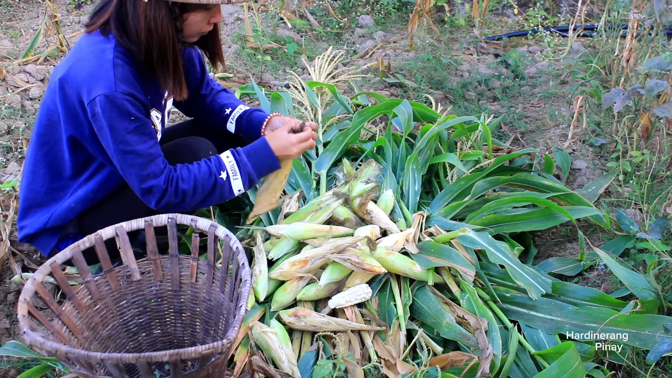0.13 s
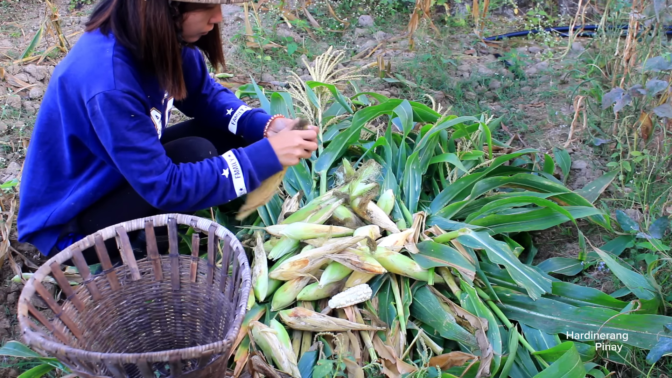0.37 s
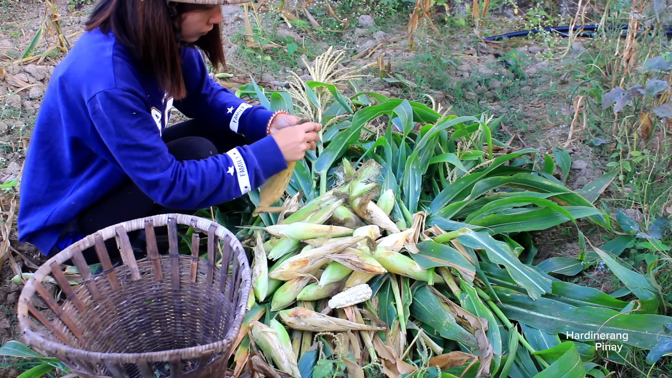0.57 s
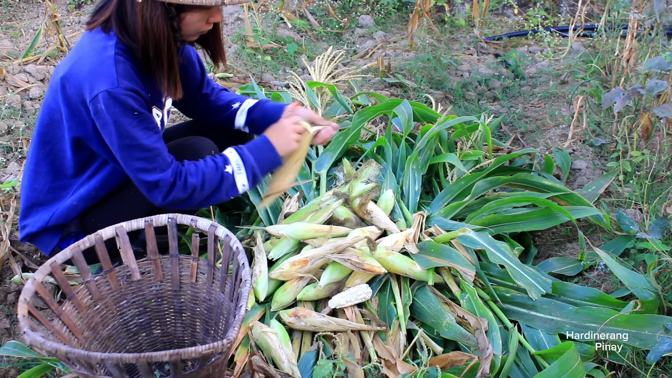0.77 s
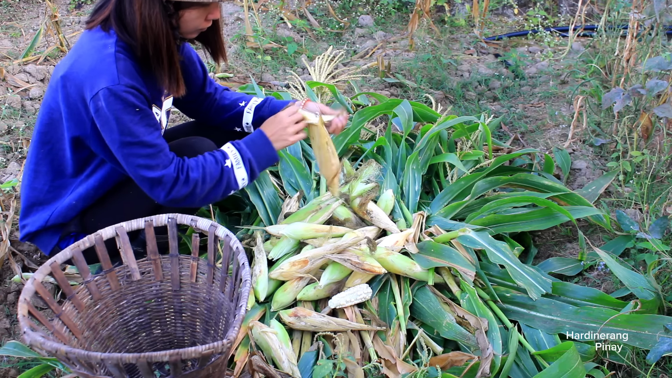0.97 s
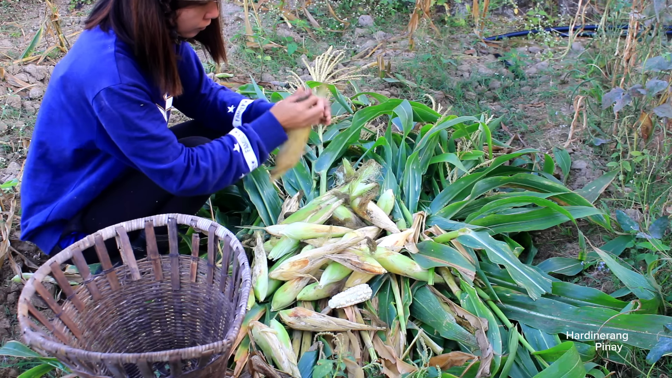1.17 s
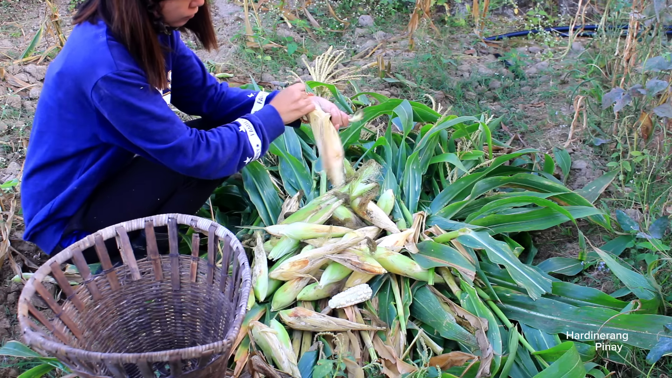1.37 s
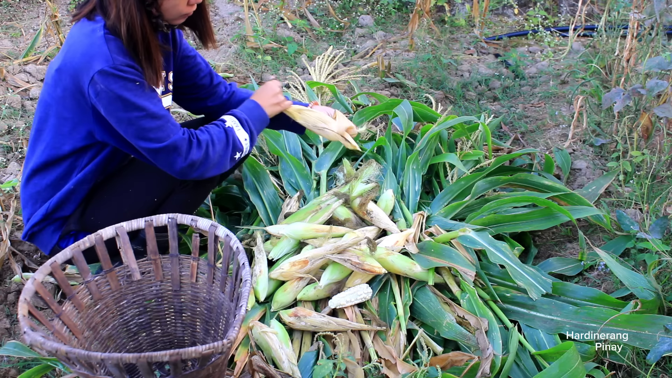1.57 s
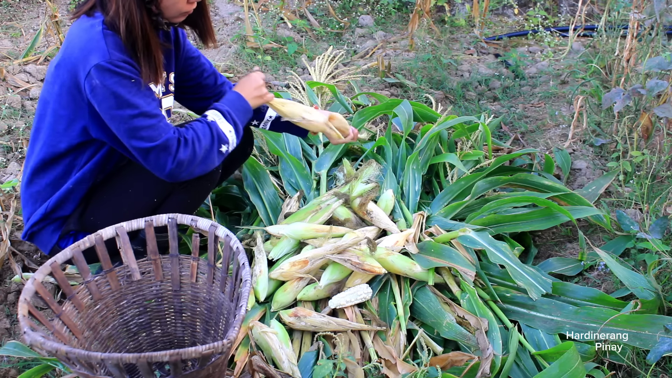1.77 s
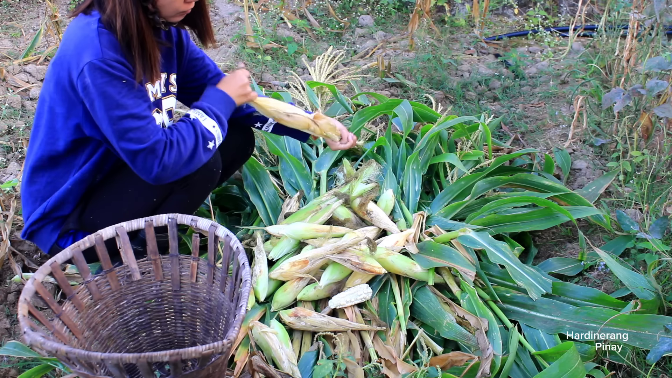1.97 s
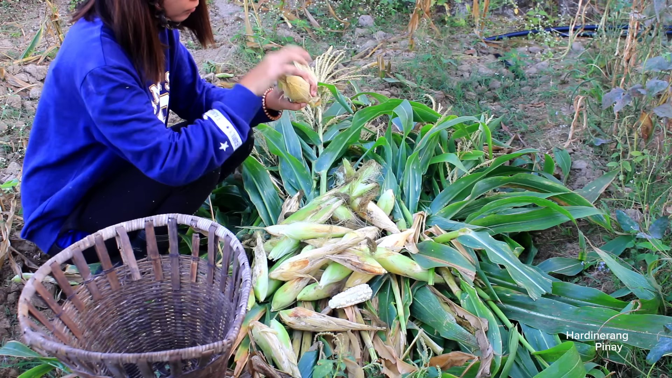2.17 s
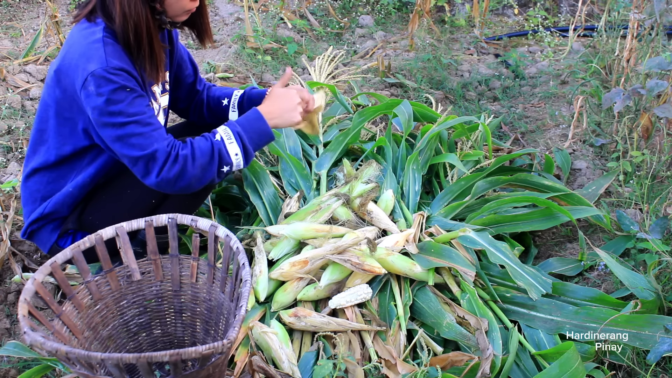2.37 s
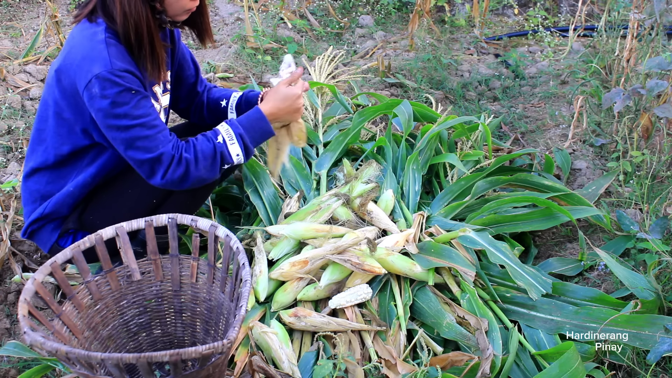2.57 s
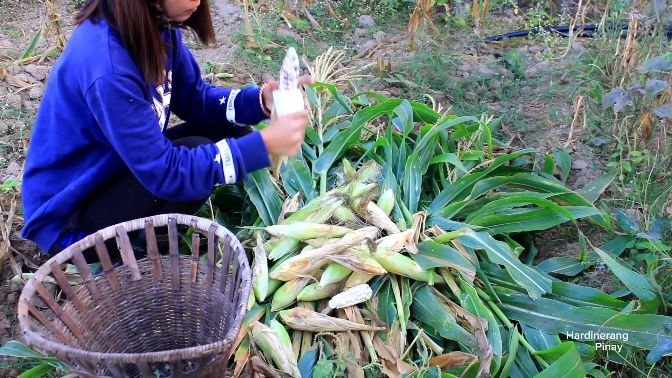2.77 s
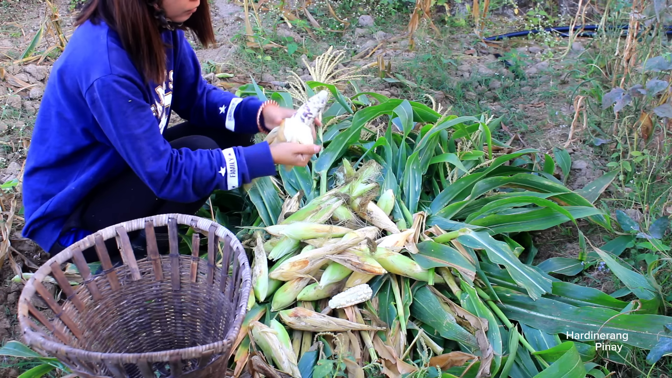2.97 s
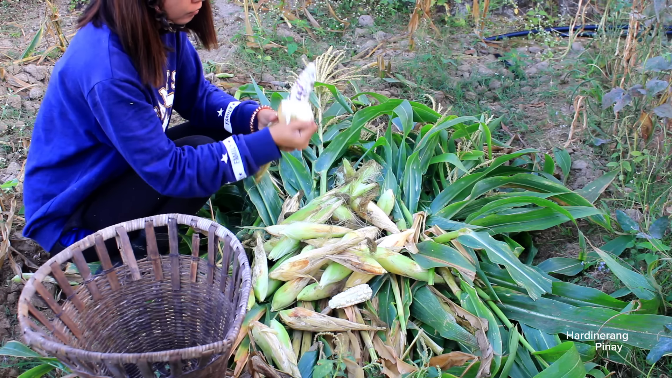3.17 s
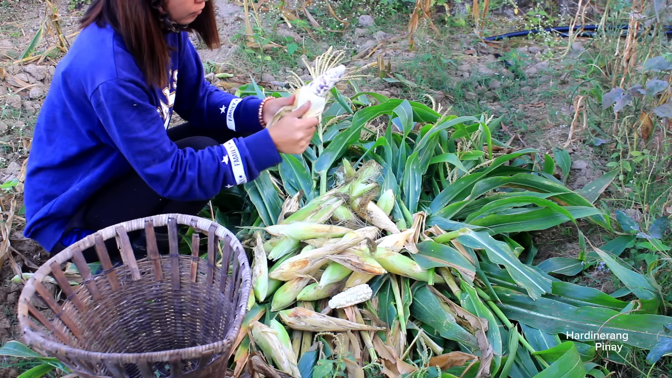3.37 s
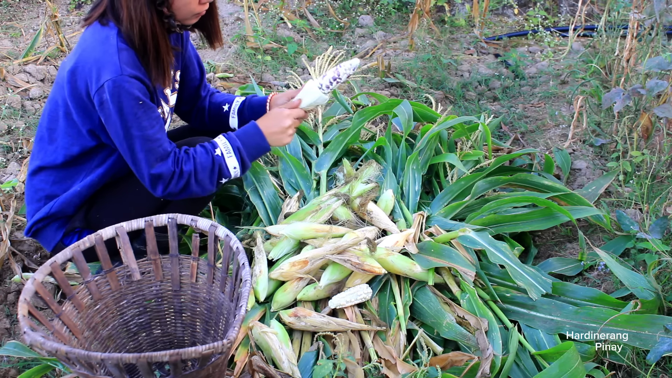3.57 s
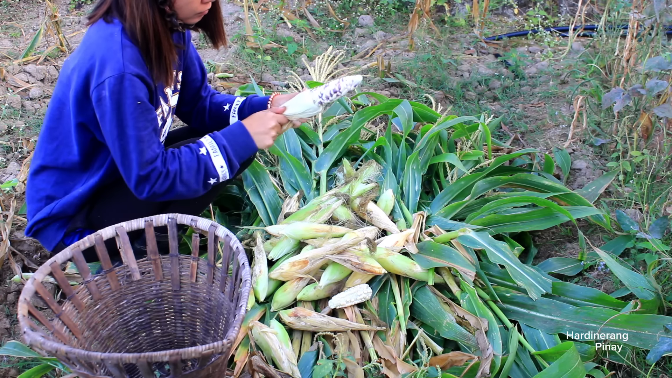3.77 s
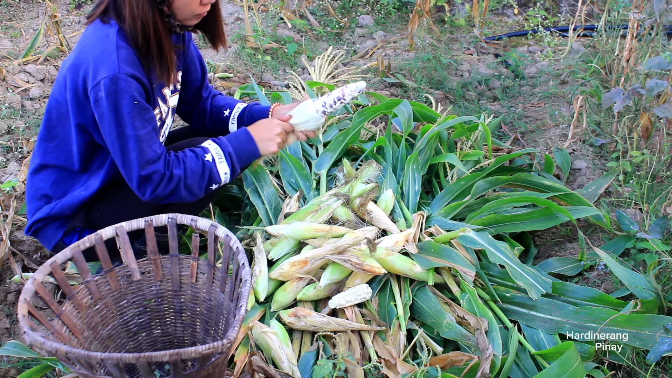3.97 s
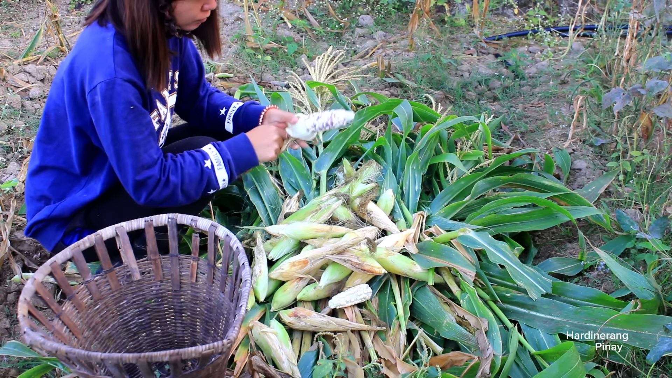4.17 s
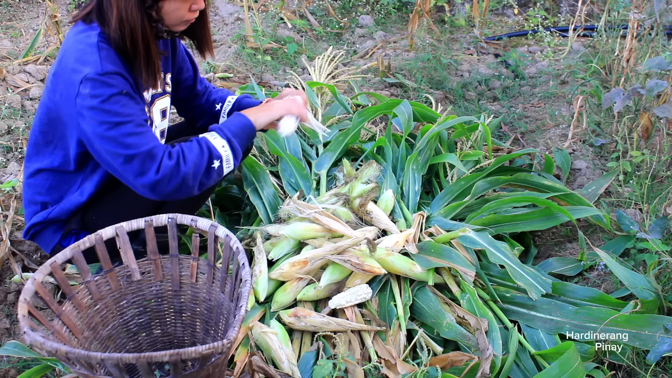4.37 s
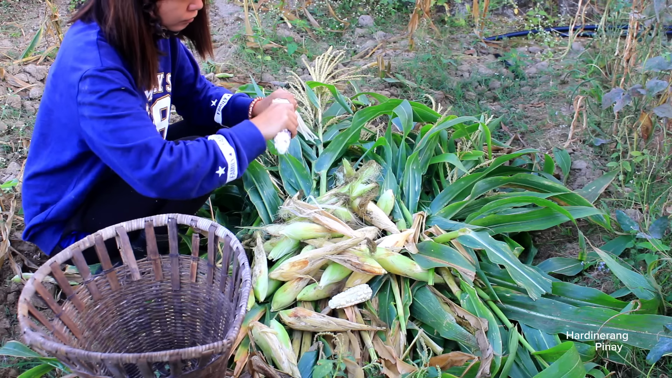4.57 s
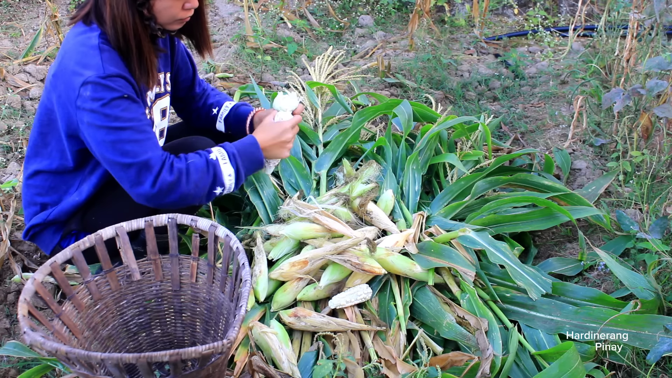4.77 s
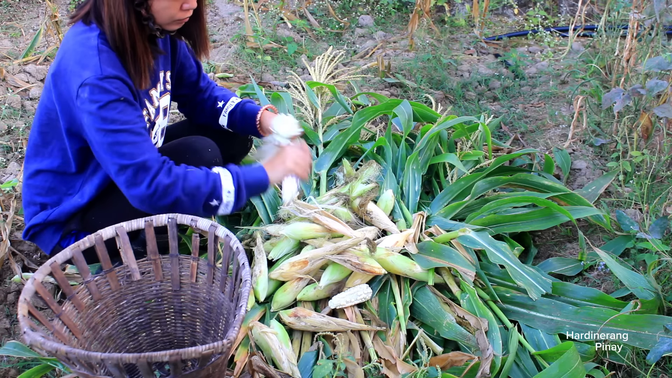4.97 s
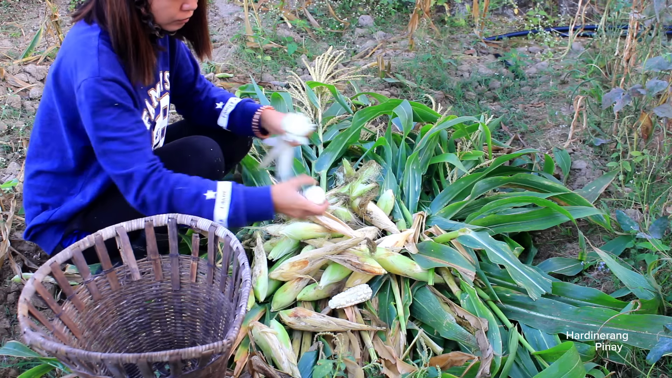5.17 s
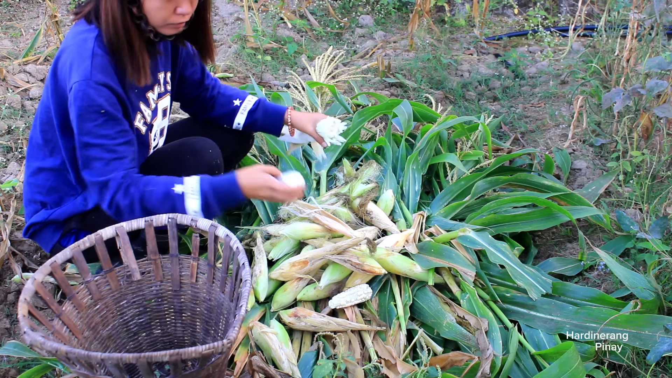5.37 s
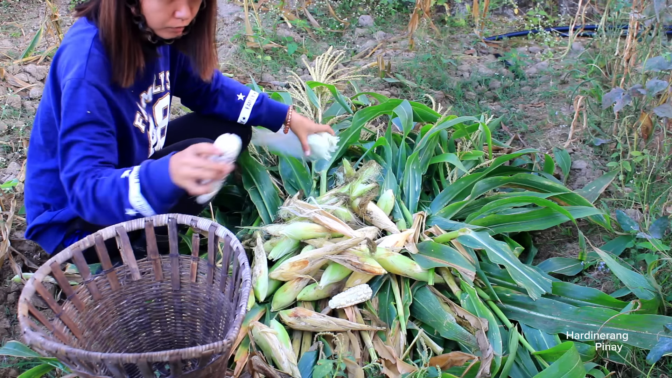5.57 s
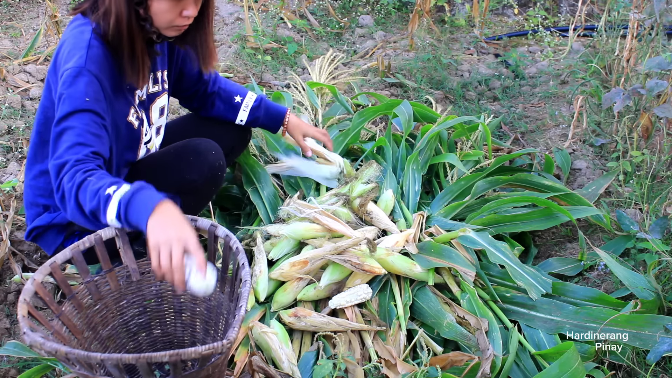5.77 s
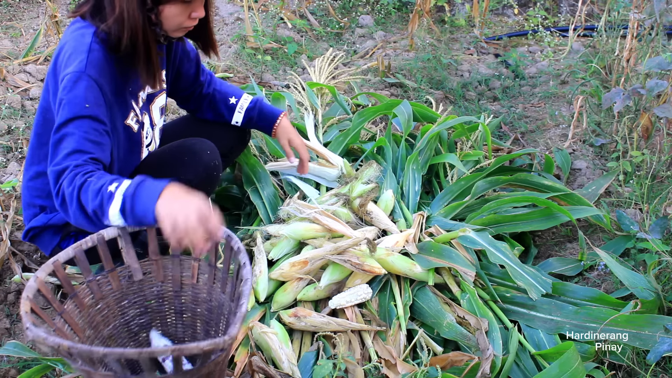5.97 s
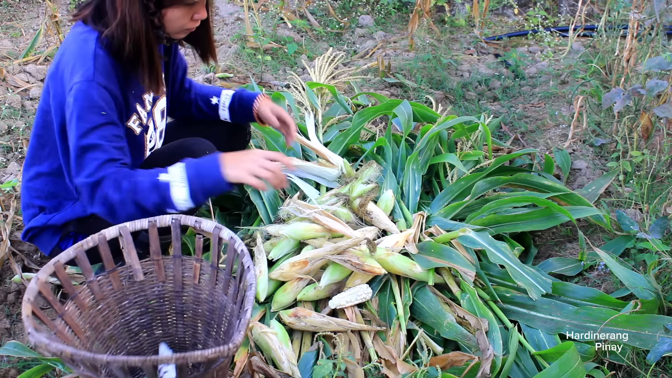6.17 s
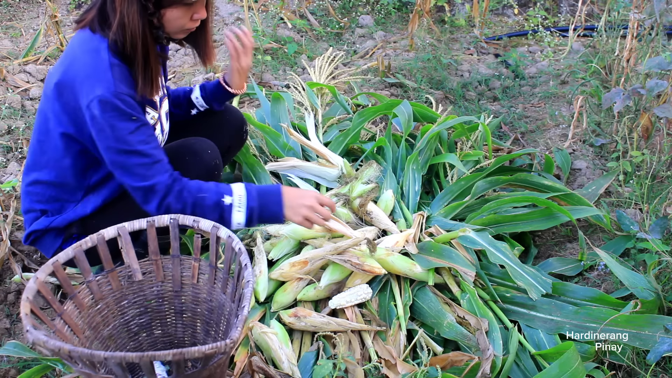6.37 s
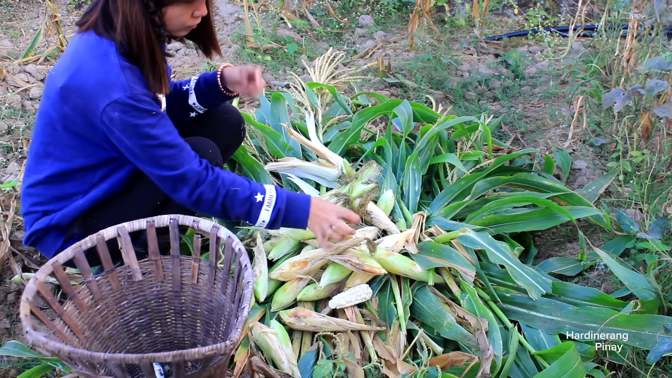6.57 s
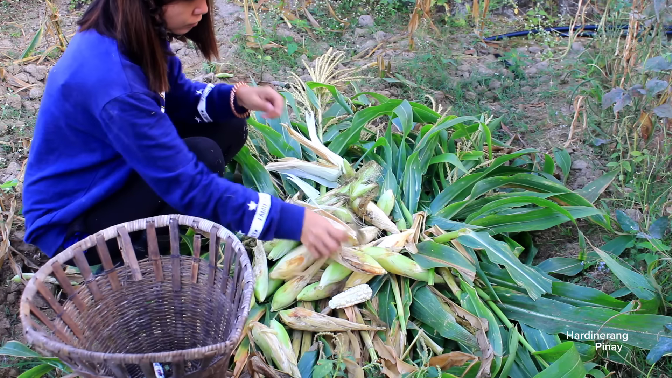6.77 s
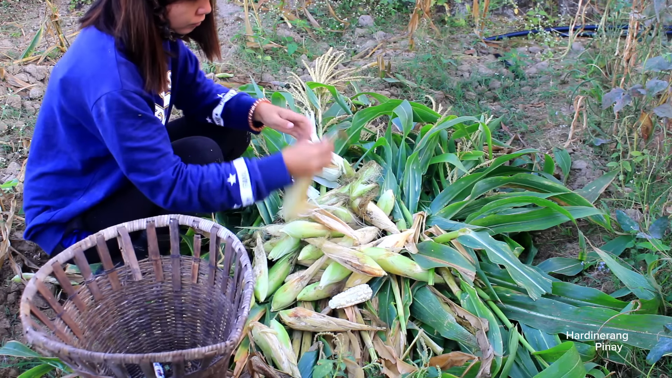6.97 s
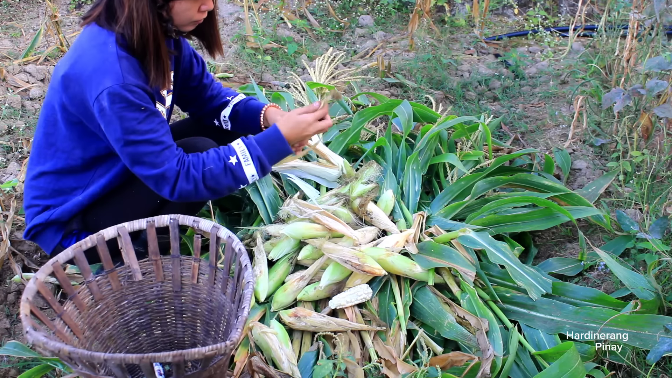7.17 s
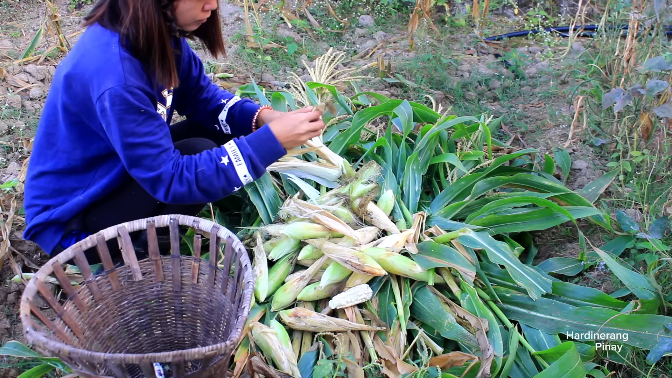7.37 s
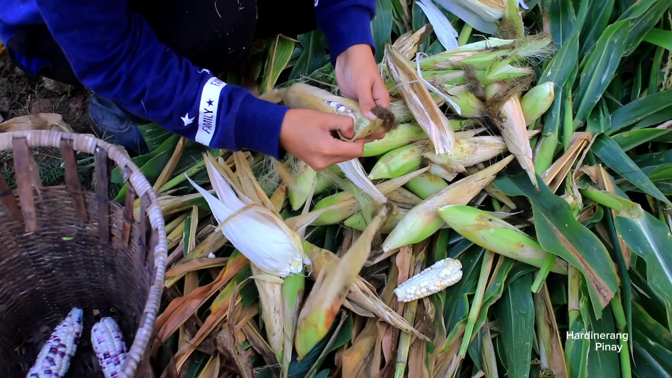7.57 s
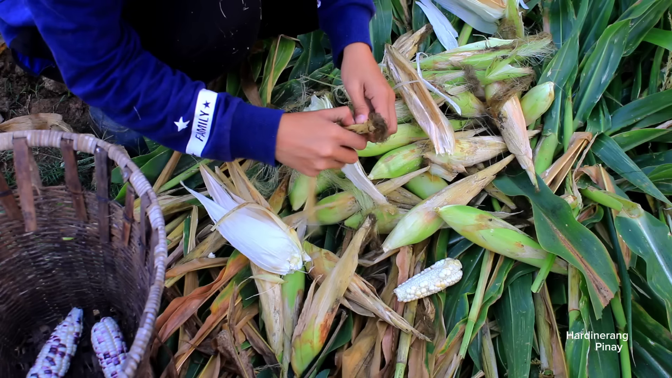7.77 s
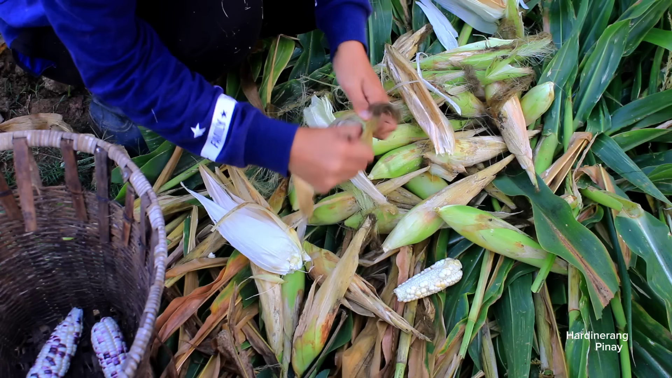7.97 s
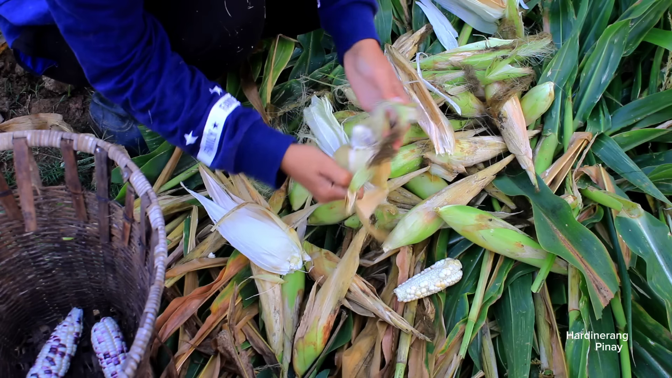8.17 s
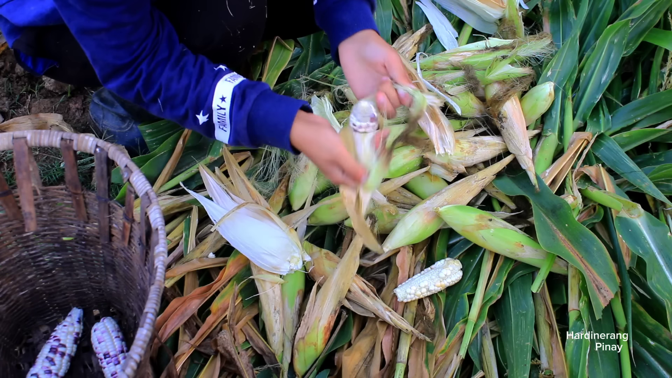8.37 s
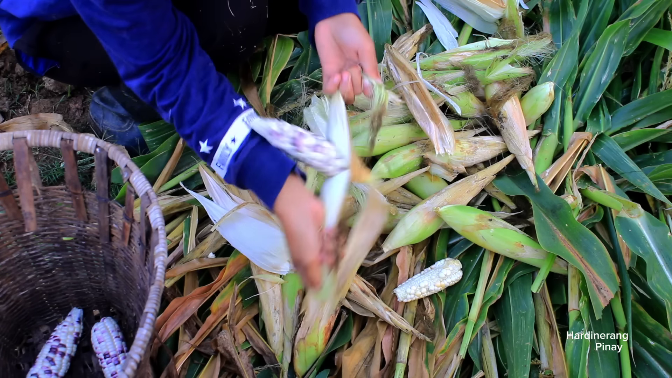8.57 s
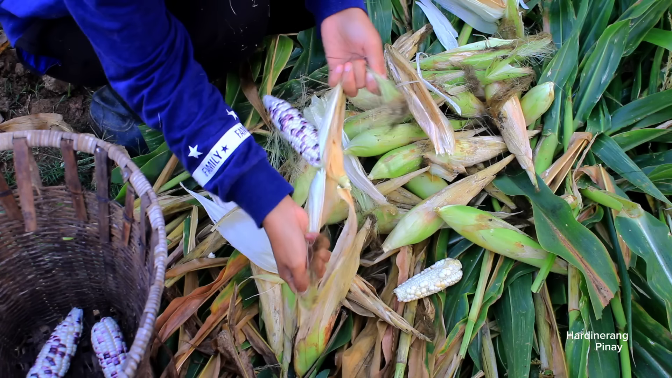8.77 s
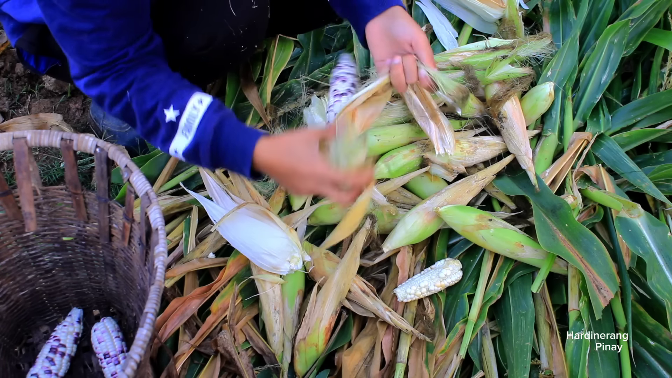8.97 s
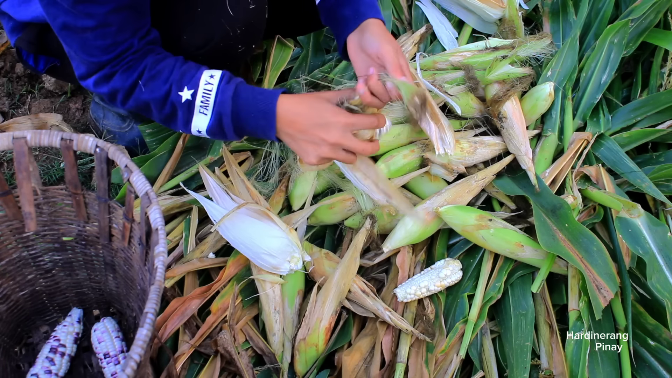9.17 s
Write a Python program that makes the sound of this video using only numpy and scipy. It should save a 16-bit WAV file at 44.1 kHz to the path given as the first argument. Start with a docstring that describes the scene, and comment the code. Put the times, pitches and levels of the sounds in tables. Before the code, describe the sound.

Dry corn husks rip and crackle by hand in a field, a stalk snaps sharply, and an ear knocks into a wicker basket amid birdsong.

```python
"""Insects, open air and a far engine hold steady while birds whistle and trill with echoes.
Then corn is husked by hand: leaves rip fibre by fibre, ribs snap and a tight leaf squeaks.
The stalk breaks off in stages and the ear drops into a wicker basket. Late on, from a second
microphone place, air and engine are plainer. Noise, cracks, ringing modes and gliding sines
make the sources; a limiter ducks on the loudest peaks."""
import sys
import numpy as np
from scipy import signal
from scipy.fft import rfft, irfft
from scipy.io import wavfile

SR = 44100
rng = np.random.default_rng(int(sys.argv[2]) if len(sys.argv) > 2 else 0)


def dump_mix(stems):
    """Bounce the given channels to the path in sys.argv[1] as a 16-bit WAV at rate SR."""
    frames = np.atleast_2d(stems).T  # one column per channel
    limited = np.clip(frames, -1, 1)  # hard clip at full scale
    pcm = np.round(limited * 32767).astype(np.int16)
    wavfile.write(sys.argv[1], SR, pcm)


N = 407043
TIME = np.arange(N) / SR


def from_db(db):
    """Decibels to amplitude gain."""
    return 10 ** (np.asarray(db) / 20)


def rms_one(x):
    """Scale to unit rms."""
    return x / np.sqrt(np.mean(x ** 2) + 1e-20)


def at_hz(points, hz):
    """Read a spectrum in dB on a log-frequency axis."""
    freq, db = np.transpose(points)
    return np.interp(np.log(hz), np.log(freq), db)


def drift(knots_per_s):
    """Smooth random wander of unit rms."""
    knots = rng.standard_normal(20000)
    return rms_one(np.interp(TIME * knots_per_s, np.arange(len(knots)), knots))


def add(out, s, sound):
    """Mix a short sound in at time s."""
    at = int(s * SR)
    out[at:at + len(sound)] += sound[:N - at]


def band_noise_filter(low_hz, high_hz):
    """Second-order Butterworth band-pass."""
    return signal.butter(2, [low_hz, high_hz], "band", fs=SR, output="sos")


def band_rms(x, low_hz, high_hz):
    """Strength of a sound between two frequencies."""
    return signal.sosfilt(band_noise_filter(low_hz, high_hz), x).std()


def coloured(x, *spectra):
    """Minimum-phase filter with the product of the given spectra, built through the cepstrum."""
    size = 4096
    hz = np.linspace(1, SR / 2, size // 2 + 1)
    total_db = sum(at_hz(points, hz) for points in spectra)
    cepstrum = irfft(np.log(from_db(total_db)))
    cepstrum[1:size // 2] *= 2
    cepstrum[size // 2 + 1:] = 0
    impulse = irfft(np.exp(rfft(cepstrum)))[:size // 2]
    return signal.fftconvolve(x, impulse)[:len(x)]


def pulse_train(turns):
    """One unit impulse per completed turn."""
    return np.diff(np.floor(turns), prepend=0)


# open-air noise spectrum: (frequency [Hz], density [dB/Hz])
AIR_COLOUR = [(30, -17), (70, -3.5), (130, 0), (300, 1.5), (600, -1), (1300, -2.5), (2300, -3),
              (3200, -3.5), (4000, -8), (5500, -3), (7200, -7), (8500, -10), (10200, -21.5), (13000, -26.5),
              (15500, -37)]
AIR_DB = -49.5
# extra air noise at the second microphone place: (frequency [Hz], density [dB/Hz])
CLOSE_AIR_COLOUR = [(40, -8), (90, -0.5), (300, 4), (650, 5), (1100, 3), (3000, -7), (6000, -10),
                    (14000, -30)]
CLOSE_S, CLOSE_FADE_S, CLOSE_AIR_DB = 7.54, 0.0098, -50
# engine lines: (multiple of firing rate, level at first place [dB], level at second place [dB])
ENGINE_LINES = [(3, -81, -75), (4, -68.5, -60.5), (5, -74.5, -69), (10, -81, -71), (11, -83, -66.5),
                (13, -76, -63.5), (15, -81, -64), (17, -86, -62), (19, -92, -69)]
ENGINE_HZ, LINE_WAVER_DB = 37.57, 3.0
# exhaust spectrum: (frequency [Hz], density [dB/Hz])
EXHAUST_COLOUR = [(40, -17), (90, -10.5), (260, 1.5), (400, 5.5), (560, 3), (690, 3.5), (850, -11),
                  (1300, -6), (3000, -42), (9000, -66)]
EXHAUST_DB, SMEAR_T60_S = -55, 0.07
# insect choruses: (centre [Hz], width [Hz], unpulsed level [dB], pulses [1/s], pulse depth)
INSECT_CHORUSES = [(4680, 800, -61.5, 31, 0.78), (5790, 760, -56.5, 23, 0.17), (8370, 810, -54.5, 79, 0.28)]


def field(throb=0.41):
    """Coloured air noise, pulsed insect noise bands, engine harmonics and smeared exhaust beats."""
    close = np.clip((TIME - CLOSE_S) / CLOSE_FADE_S, 0, 1)
    turns = np.cumsum(ENGINE_HZ * (1 + 0.00615 * drift(5))) / SR
    firing_phase = 2 * np.pi * turns

    out = from_db(AIR_DB) * rms_one(coloured(rng.standard_normal(N), AIR_COLOUR))
    throbbing = rng.standard_normal(N) * (1 + throb * np.cos(firing_phase))
    out += close * from_db(CLOSE_AIR_DB) * rms_one(coloured(throbbing, CLOSE_AIR_COLOUR))

    # each exhaust beat is smeared by its way across the field
    t = TIME[:SR // 10]
    path = rng.standard_normal(len(t)) * np.exp(-np.log(1000) * t / SMEAR_T60_S)
    beats = pulse_train(turns) * from_db(1.3 * drift(38))
    smeared = signal.fftconvolve(beats, path)[:N]
    out += close * from_db(EXHAUST_DB) * rms_one(coloured(smeared, EXHAUST_COLOUR))

    for multiple, far_db, close_db in ENGINE_LINES:
        level_db = far_db + close * (close_db - far_db) + LINE_WAVER_DB * drift(9.8)
        line = np.sin(multiple * firing_phase + 2 * np.pi * rng.random())
        out += np.sqrt(2) * from_db(level_db) * line

    for hz, width_hz, db, pulses_per_s, depth in INSECT_CHORUSES:
        sos = band_noise_filter(hz - width_hz / 2, hz + width_hz / 2)
        pulse_turns = np.cumsum(pulses_per_s * (1 + 0.0943 * drift(6.6))) / SR
        strokes = 1 + depth * np.sin(2 * np.pi * pulse_turns)
        out += from_db(db) * strokes * rms_one(signal.sosfilt(sos, rng.standard_normal(N)))
    return out


# note shapes: (length [s], start [Hz], middle [Hz], end [Hz]); calls scale the pitch by their ratio
HELD = (.084, 2200, 1920, 2230)
DIP = (0.043, 1970, 2040, 1760)
SLIDE = (.092, 3290, 2948, 2820)
FLICK = (.026, 2200, 2370, 2510)
CHIP = (0.0243, 5180, 4750, 4400)
UPSWEEP = (.07, 5650, 6500, 7200)
THIN_WHISTLE = (.11, 4900, 5120, 5300)
THIN_FALL = (.085, 5200, 4800, 4250)
SLUR = (.07, 1900, 2450, 1500)
LOW_WHISTLE = (0.278, 880, 950, 845)
LEVEL_WHISTLE = (0.1144, 3200, 3020, 3000)
HELD_FLATNESS = 4.02   # exponent: level middle, hooked ends; 2 = parabola


def glide(shape):
    """Pitch curve through the note's start, middle and end."""
    length_s, start, middle, end = shape
    u = np.linspace(-1, 1, int(length_s * SR))
    power = HELD_FLATNESS if shape == HELD else 2
    return middle + (end - start) / 2 * u + ((start + end) / 2 - middle) * np.abs(u) ** power


CHORUS_PER_S, CHORUS_DB, CHORUS_SCATTER_DB, CHORUS_SCATTER_OCTAVES = 4, -59, 1.5, 0.091   # before BIRD_GAIN_DB


def chorus(count=80):
    """Faint distant calls at random times, cycling through a few note shapes."""
    shapes = [SLUR, CHIP, THIN_FALL, SLUR, LEVEL_WHISTLE]
    times = np.cumsum(rng.exponential(1, count)) / CHORUS_PER_S
    draws = rng.standard_normal((count, 2))
    notes = []
    for k, (s, (pitch, loud)) in enumerate(zip(times, draws)):
        if s < TIME[-1] - .5:
            ratio = 2 ** (CHORUS_SCATTER_OCTAVES * pitch)
            notes.append((s, shapes[k % len(shapes)], ratio, CHORUS_DB + CHORUS_SCATTER_DB * loud))
    return notes


# all bird levels are before BIRD_GAIN_DB
# lead-in to the first song: (time [s], note shape, level [dB])
LEAD_IN = [(.006, HELD, -41), (.211, DIP, -43), (.263, SLIDE, -31)]
# near songs: (time [s], trill length [s], level [dB])
SONGS = [(0.333, .098, -33.5), (4.286, .062, -33)]
# from the trill's end, level relative to the trill
FLICK_AFTER_S, FLICK_DB, HELD_AFTER_S, HELD_DB = 0.0056, -8, .04, -11
# runs of falling chips: (time [s], level of each chip [dB])
CHIP_RUNS = [(2.36, -45), (4.446, -44.5), (4.69, -44.5), (5.01, -44)]
CHIP_GAP_S = .034
# single calls, one table per note shape: (time [s], pitch ratio, level [dB])
UPSWEEPS = [(4.44, 0.98, -46.5), (4.895, 1.05, -52), (5.115, 1.01, -52), (5.33, .99, -49.5),
            (5.555, 0.95, -50)]
THIN_WHISTLES = [(.015, 1.05, -52), (3.9, 0.56, -58), (4.355, 0.94, -53), (4.85, 1.06, -49.5),
                 (4.88, 0.59, -54), (4.95, .73, -54.5), (7.32, .98, -53), (7.849, 1.13, -46.5),
                 (8.199, 1.22, -50)]
THIN_FALLS = [(.145, .97, -57), (2.565, 1.06, -49), (5.18, 1.05, -52), (7.455, 1.1, -52)]
SLURS = [(5.115, 1.2, -57), (5.367, 1.01, -59), (5.88, .95, -58), (6.22, 1.02, -59), (6.362, .95, -61),
         (6.66, 1.02, -59), (6.8, 0.91, -52)]
LEVEL_WHISTLES = [(7.38, 1.08, -57), (8.24, .98, -52.5), (8.54, 0.94, -39), (8.69, 1.1, -54),
                  (8.915, 1.08, -48), (8.91, 1.27, -49)]
LOW_WHISTLES = [(2.23, 1.19, -57), (2.8, 1.04, -55), (3.27, .92, -59.5)]


def bird_notes(chips_per_run=3):
    """Every whistled note as (time [s], shape, pitch ratio, level [dB])."""
    notes = [(s, shape, 1, db) for s, shape, db in LEAD_IN]
    for s, length_s, db in SONGS:
        end_s = s + length_s
        notes.append((end_s + FLICK_AFTER_S, FLICK, 1, db + FLICK_DB))
        notes.append((end_s + HELD_AFTER_S, HELD, 1, db + HELD_DB))
    for s, db in CHIP_RUNS:
        notes += [(s + k * CHIP_GAP_S, CHIP, 1, db) for k in range(chips_per_run)]
    kinds = [(UPSWEEP, UPSWEEPS), (THIN_WHISTLE, THIN_WHISTLES), (THIN_FALL, THIN_FALLS),
             (SLUR, SLURS), (LEVEL_WHISTLE, LEVEL_WHISTLES), (LOW_WHISTLE, LOW_WHISTLES)]
    for shape, calls in kinds:
        notes += [(s, shape, ratio, db) for s, ratio, db in calls]
    return notes + chorus()


# echoes from the field's edge: (delay [s], level [dB])
ECHOES = [(0.049, -11), (.079, -13), (.121, -16), (.165, -16), (.24, -21)]
SCATTER_DB, SCATTER_T60_S = -12, 0.61   # diffuse tail energy re direct sound
TRILL_HZ, TRILL_SWEEP_HZ, TRILL_SWEEPS_PER_S = 2964, 190, 180
PITCH_WAVER, SHIMMER_DB, BIRD_GAIN_DB = 0.015, 1.36, 2


def birds():
    """Gliding sines and frequency-modulated trills, with discrete and diffuse echoes off the trees."""
    out, wobble = np.zeros(N), 1 + PITCH_WAVER * drift(250)
    for s, shape, ratio, db in bird_notes():
        pitch = ratio * glide(shape)
        hz = pitch * wobble[int(s * SR):][:len(pitch)]
        tone = np.sin(2 * np.pi * np.cumsum(hz) / SR)
        add(out, s, from_db(db) * signal.windows.tukey(len(hz), .35) * tone)

    for s, length_s, db in SONGS:
        size = int(length_s * SR)
        sweep_rate = TRILL_SWEEPS_PER_S * (1 + .15 * drift(93)[:size])
        beat = np.sin(2 * np.pi * np.cumsum(sweep_rate) / SR)
        hz = (TRILL_HZ + TRILL_SWEEP_HZ * beat) * wobble[int(s * SR):][:size]
        tone = np.sin(2 * np.pi * np.cumsum(hz) / SR)
        add(out, s, from_db(db) * signal.windows.tukey(size, .15) * (.75 - 0.25 * beat) * tone)

    out *= from_db(SHIMMER_DB * drift(70))   # moving air makes far calls swell and fade
    tail = rng.standard_normal(SR) * np.exp(-np.log(1000) * TIME[:SR] / SCATTER_T60_S)
    reply = from_db(SCATTER_DB) * rms_one(tail) / np.sqrt(SR)
    reply[0] = 1
    for delay_s, db in ECHOES:
        reply[int(delay_s * SR)] += from_db(db)
    return from_db(BIRD_GAIN_DB) * signal.fftconvolve(out, reply)[:N]


# pulls on the husk: (time [s], length [s], start level before CRACKLE_TRIM_DB [dB],
# swell over the pull [dB], arch at mid-pull [dB], low rub re crackle [dB])
PULLS = [(0.805, 0.14, -38, -3, 8.5, -13), (1.022, 0.22, -48.5, 4.5, 0, -19),
         (1.251, 0.11, -39.5, -1.5, 0.5, -5), (1.378, 0.055, -35, 2, -0.5, -7.5),
         (1.434, 0.12, -30, -3, 3, -8.5), (1.547, 0.19, -31.5, -2, -2, -5),
         (1.795, 0.17, -36.5, -2.5, 0.5, -2), (1.962, 0.0256, -29.5, 1.5, -0.5, -5.5),
         (2.182, 0.016, -37, 1.5, 0.5, -10), (2.26, 0.053, -46.5, 0, 2.5, -9),
         (2.414, 0.089, -45.5, 5.5, 1.5, -3.5), (2.548, 0.14, -44.5, -0.5, -3.5, -6.5),
         (2.684, .065, -39, 6.5, 3, -5.5), (2.95, 0.067, -50.5, 4.5, 1.5, -1),
         (3.072, 0.23, -47, 0.5, -1, 0.5), (3.361, 0.048, -45.5, 1, 3, -3.5),
         (3.522, 0.17, -41, -5.5, 0, -4), (3.73, 0.061, -37.5, -1, 4, -4),
         (3.991, .072, -46.5, 11.5, 0.5, -8.5), (5.021, 0.029, -36, -2, 1, -10.5),
         (5.704, 0.12, -39.5, -2.5, -5.5, -7), (6.196, 0.1, -46.5, 3.5, -7, -9),
         (6.767, .1, -50, 0.5, 7.5, -20), (7.02, .04, -47.5, -0.5, 2, -6), (7.089, 0.019, -50.5, -1, -1, 0),
         (7.215, .06, -50, 3, 2, -6.5), (7.542, 0.04, -36.5, -4.5, -1.5, -8),
         (7.661, .18, -43.5, 3.5, -1, -10.5), (7.999, 0.096, -29.5, 1, 0, -16),
         (8.11, 0.072, -37.5, -5, -0.5, -9), (8.243, 0.044, -42, -0.5, 2, -21),
         (8.387, 0.074, -42.5, 15, -1, -10), (8.458, 0.21, -29.5, 4.5, 0.5, -8),
         (8.923, 0.089, -46, -1, 5, -13.5), (9.035, 0.042, -37.5, 4.5, 1, -20),
         (9.129, 0.013, -24.5, -0.5, -2, -34)]
# edge slopes at the reference length; longer pulls are gentler
PULL_RISE_DB_PER_S, PULL_FALL_DB_PER_S, PULL_LENGTH_S, GENTLENESS = 1500, 646, 0.071, 0.46


def effort():
    """Pull envelopes: crackle level and the low rub of the strongest pull, both in dB."""
    level, grip = np.full(N, -120.), np.zeros(N)
    for s, length_s, db, swell_db, arch_db, rub_db in PULLS:
        t = TIME - s
        quickness = (PULL_LENGTH_S / length_s) ** GENTLENESS
        u = np.clip(t / length_s, 0, 1)
        rise = PULL_RISE_DB_PER_S * np.maximum(-t, 0)
        fall = PULL_FALL_DB_PER_S * np.maximum(t - length_s, 0)
        arch = arch_db * (1 - (2 * u - 1) ** 2)
        own = db + swell_db * u + arch - quickness * (rise + fall)
        grip[own > level] = rub_db
        level = np.maximum(level, own)
    return level, grip


# husk spectrum, shared with the snaps: (frequency [Hz], density [dB/Hz])
HUSK_COLOUR = [(120, -46), (200, -21), (215, -35), (253, -18.5), (385, -15.5), (728, -12), (940, -6),
               (1880, 0.5), (2380, -1.5), (3120, 0), (5110, -1.5), (7620, 2), (8980, -5), (13200, -27.5),
               (15500, -42)]
EDGES_HZ = np.geomspace(150, 16000, 20)
BANK = [band_noise_filter(low, high) for low, high in zip(EDGES_HZ, EDGES_HZ[1:])]
GRIP_HZ = 3100   # below: rub of the ear's body; above: crackle
FIBRES_PER_S, FIBRE_SIZE_DB, CLUMP_DB = 1600, 1.0, 1.1
PATCHY_DB, SLIDE_DB, CRACKLE_TRIM_DB = 2.0, -4, -1.0


def tearing(level, grip):
    """Clumped fibre breaks, each with random colour, over the hiss of leaf sliding on leaf."""
    clumps = rms_one(from_db(CLUMP_DB * drift(160)))
    at = np.flatnonzero(rng.random(N) < FIBRES_PER_S * clumps / SR)
    spread = rms_one(from_db(FIBRE_SIZE_DB * np.minimum(rng.exponential(1, N), 5)))
    sizes = spread[at] * np.sqrt(N / len(at))
    slide = from_db(SLIDE_DB) * rng.standard_normal((2, N)) * clumps
    out = np.zeros(N)
    for k, sos in enumerate(BANK):
        drive = slide[k % 2].copy()
        drive[at] += sizes * rng.standard_normal(N)[at]
        # the bending leaf keeps shifting its resonances
        out += signal.sosfilt(sos, drive) * from_db(PATCHY_DB * drift(55))
    out = coloured(out, HUSK_COLOUR)

    low = signal.sosfiltfilt(signal.butter(2, GRIP_HZ, fs=SR, output="sos"), out)
    high = out - low
    # a tight grip couples the leaf to the ear and brings out the lows
    body = low / band_rms(low, 900, 2400)
    crackle = high / band_rms(high, 3500, 12000)
    return (crackle + body * from_db(grip)) * from_db(level + CRACKLE_TRIM_DB)


RIBS_PER_S, RIB_FLOOR_DB = 9, -47.5   # pulls above the floor can break ribs
RIB_OVER_DB, RIB_LOW_DB, RIB_HIGH_DB, RIB_SCATTER_DB, RIB_SHIVER_DB = 8.5, -18, -13.5, 2.5, -12.5


def thin_ribs(level):
    """Random small breaks that follow the pull level, as rows like THICK_RIBS."""
    draws = rng.standard_normal((N // 100, 3))
    slots = np.linspace(0, N - 1, len(draws)).astype(int)
    chance = RIBS_PER_S * N / SR / len(draws)
    breaks = (rng.random(len(draws)) < chance) & (level[slots] > RIB_FLOOR_DB)
    rows = []
    for at, draw in zip(slots[breaks], draws[breaks]):
        db, low, high = RIB_SCATTER_DB * draw + [level[at] + RIB_OVER_DB, RIB_LOW_DB, RIB_HIGH_DB]
        rows.append((at / SR, db, low, high, RIB_SHIVER_DB))
    return rows


def crack(spectra, t60, tail_db, tail_t60):
    """Sudden fracture: random-sign noise, fast decay plus a slower shivering tail; peak 1."""
    t = TIME[:SR // 10] * np.log(1000)
    decay = np.exp(-t / t60) + from_db(tail_db) * np.exp(-t / tail_t60)
    sound = coloured(rng.choice([-1, 1], len(t)) * decay, *spectra)
    return sound / np.abs(sound).max()


# thick ribs: (time [s], peak [dB], low-band tilt [dB], high-band tilt [dB], leaf shiver [dB])
THICK_RIBS = [(1.262, -23, -24, -20, 0), (1.3, -17, -26, -25, -1), (1.307, -17, -24, -18, -7),
              (1.345, -21, -19.5, -34, 0), (1.4373, -13.5, -17, -19, -1), (1.5509, -13, -13, -14, 0),
              (1.6334, -14.5, -12, -14, -2), (1.751, -21, -17, -11, -12), (1.945, -15, -9, -26, -8),
              (1.9645, -12, -17, -27, -11), (1.983, -10, -27, -29, -12), (1.9907, -12, -21, -23, -21),
              (2.054, -27.5, 14, -23, -12), (2.1834, -28, -7, -29, -12), (2.3905, -22, -16, -27, -6),
              (2.5503, -23, -16, -19, -5), (2.689, -17.5, -6.5, -18, -6), (2.734, -22, 20, -18, -14),
              (2.7914, -21, -35, -12, -10), (3.5672, -18, -38, -14, -11), (3.632, -24.5, 5, -22, -9),
              (3.698, -21, -23, -17, -10), (3.726, -22.5, 1, -6, -8), (3.758, -17.5, -11, -4, -13),
              (5.0182, -21, -22, -9, -12), (5.051, -25, 0, -18, -9), (6.347, -14.5, -14, -3.5, -17),
              (7.5422, -23.5, -24, -8.5, -10), (7.997, -18, -27, -10, -1), (8.0814, -14.5, -28, -6, -12),
              (8.5138, -14.5, -19, -4, -6), (8.665, -6, -29, -9, -12), (8.6678, -5, -18, -7.5, -14),
              (8.6739, 3, -19, -21.5, -11), (8.7128, -13.5, -13, -9, -9), (9.076, -18, -2, -11, -12),
              (9.131, -11, -36, -7, -7), (9.1425, -3.5, -21.5, -9, -31)]
SNAP_MIDDLE_DB = -15


def snaps(level):
    """Ribs break as short cracks, each with its own tilt of the husk colour."""
    out = np.zeros(N)
    for s, db, low, high, shiver_db in THICK_RIBS + thin_ribs(level):
        tilt = [(1500, low), (3800, SNAP_MIDDLE_DB), (8000, high), (11000, 1.83 * high + 9)]
        sound = crack([HUSK_COLOUR, tilt], t60=0.0022, tail_db=shiver_db, tail_t60=0.043)
        add(out, s, from_db(db) * sound)
    return out


def ring(clicks, modes):
    """Clicks drive damped two-pole modes of alternating sign."""
    out = 0
    for k, (hz, db, t60_s) in enumerate(modes):
        r, w = np.exp(-np.log(1000) / (t60_s * SR)), 2 * np.pi * hz / SR
        mode = signal.lfilter([0, np.sin(w)], [1, -2 * r * np.cos(w), r * r], clicks + 1e-18)
        out = out + (-1) ** k * from_db(db) * mode
    return out


# stick-slip of leaf on leaf, interpolated: (time [s], slips [1/s], level [dB])
SLIP_CURVE = [(1.77, 640, -54), (1.794, 970, -32), (1.805, 590, -50), (1.825, 610, -32.5), (1.86, 360, -32),
              (1.896, 480, -30.5), (1.912, 580, -23), (1.925, 870, -29.5), (1.975, 490, -30)]
# modes of the ear wrapped in its leaves: (frequency [Hz], gain [dB], t60 [s])
EAR_MODES = [(690, -9, 0.0028), (1280, -3.5, 0.013), (1935, -2.5, 0.013), (2480, -4.5, 0.015),
             (3050, -6, 0.0086), (4600, -4, 0.0038)]
SLIP_WANDER, SLIP_FLUTTER_DB = .045, 1.5   # log-rate spread; strength spread


def squeak():
    """A tight leaf judders down the ear: each slip is a click that rings the ear's modes."""
    s, rate, db = np.transpose(SLIP_CURVE)
    slip_rate = np.interp(TIME, s, rate) * np.exp(SLIP_WANDER * drift(400))
    slips = pulse_train(np.cumsum(slip_rate) / SR) * from_db(SLIP_FLUTTER_DB * drift(300))
    level_db = np.interp(TIME, s, db, left=-140, right=-140)
    return rms_one(ring(slips, EAR_MODES)) * from_db(level_db)


# stages of the break: (time [s], peak [dB], t60 [s])
STALK_STAGES = [(4.7487, 6, 0.018), (4.7498, 1, 0.0066), (4.7531, -.5, .013), (4.7547, 4.5, .0066),
                (4.7583, -5, 0.07), (4.766, -3.5, 0.0044), (4.7772, -14, .01)]
# stalk spectrum: (frequency [Hz], density [dB/Hz])
STALK_COLOUR = [(40, -9), (350, -16.5), (750, -10), (1200, -8), (1480, 0), (1950, -9), (2700, -0.5),
                (3800, -3), (4900, -0.5), (5600, -8.5), (7000, -1.5), (8500, -9), (9500, -17), (11000, -23),
                (15500, -37)]


def stalk():
    """The juicy shank breaks off the ear in a burst of cracks."""
    out = np.zeros(N)
    for s, db, t60_s in STALK_STAGES:
        add(out, s, from_db(db) * crack([STALK_COLOUR], t60_s, tail_db=-18, tail_t60=0.067))
    return out


# contacts of ear and basket: (time [s], knock drive [dB], click peak [dB])
LANDINGS = [(6.0466, -36, -10.5), (6.0485, -21, -9.5), (6.0505, -26.5, -33), (6.0926, -43, -14.5),
            (6.0952, -33.5, -29), (6.064, -33, -22), (6.194, -35.5, -30.5), (6.964, -40.5, -39)]
# basket modes: (frequency [Hz], gain [dB], t60 [s])
BASKET_MODES = [(201, -19, 0.07), (322, -11.5, 0.067), (540, -0.5, 0.017), (683, -2, 0.053),
                (960, -10, 0.034), (1240, -8, .02), (1750, -5, 0.029), (2000, -1.5, 0.014),
                (3180, -16, .015)]
# click spectrum: (frequency [Hz], density [dB/Hz])
WICKER_COLOUR = [(20, -45), (70, -22), (250, -7), (700, -6.5), (1800, -3.5), (3200, 0), (5000, -7),
                 (8000, -4.5), (11000, -18), (15500, -42)]


def basket():
    """The ear lands, bounces and settles: knocks ring the wicker's modes, kernels click on it."""
    knocks, clicks = np.zeros(N), np.zeros(N)
    for s, knock_db, click_db in LANDINGS:
        add(knocks, s, from_db([knock_db]))
        click = crack([WICKER_COLOUR], t60=0.011, tail_db=-18.5, tail_t60=0.15)
        add(clicks, s, from_db(click_db) * click)
    return ring(knocks, BASKET_MODES) + clicks


def scene():
    """Sum of all sources, one channel."""
    level, grip = effort()
    husking = tearing(level, grip) + snaps(level) + squeak()
    return (field() + birds() + husking + stalk() + basket())[None]


CUTOFF_HZ = 15800


def record(dry, threshold_db=-3.5, release_db_per_s=55, attack_s=0.0011):
    """Peak limiter with slow linear-dB release; what slips past is clipped, then low-passed."""
    over = np.maximum(20 * np.log10(np.abs(dry[0]) + 1e-9) - threshold_db, 0)
    release = release_db_per_s * TIME
    held = np.maximum.accumulate(over + release) - release
    lag = np.exp(-1 / (attack_s * SR))
    reduction_db = signal.lfilter([1 - lag], [1, -lag], held)
    clipped = np.clip(dry * from_db(-reduction_db), -1, 1)
    return signal.sosfilt(signal.ellip(10, .1, 70, CUTOFF_HZ, fs=SR, output="sos"), clipped)


dry = scene()
out = record(dry)
dump_mix(out)
```